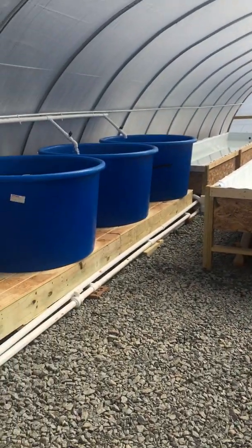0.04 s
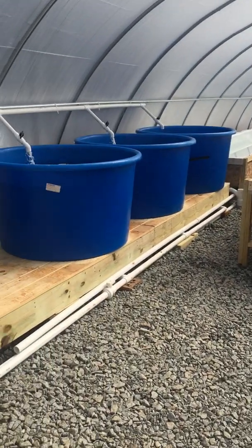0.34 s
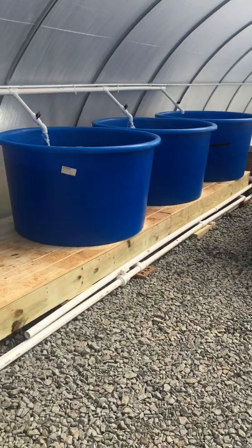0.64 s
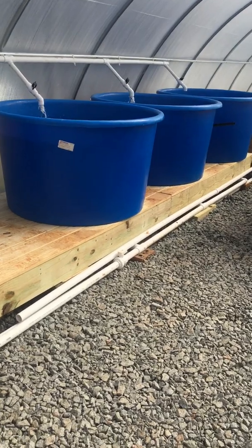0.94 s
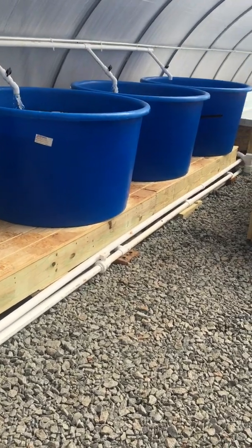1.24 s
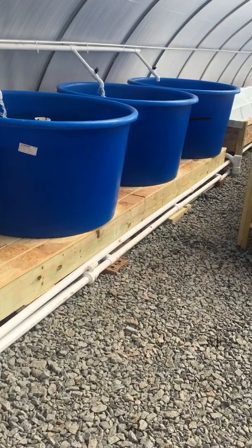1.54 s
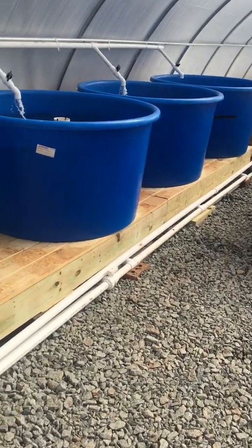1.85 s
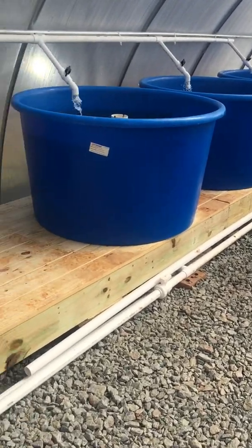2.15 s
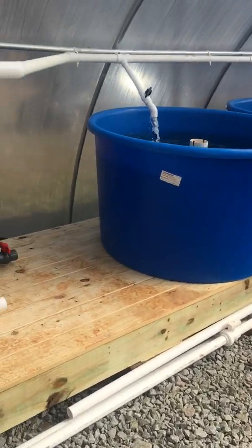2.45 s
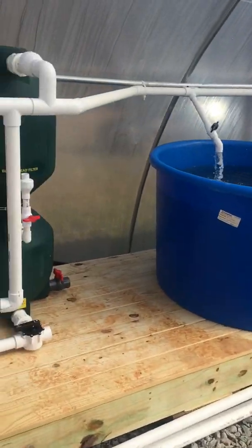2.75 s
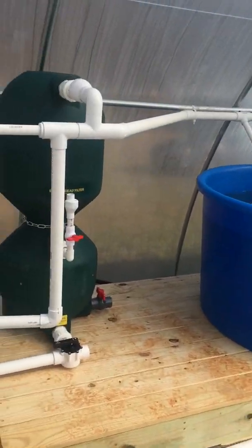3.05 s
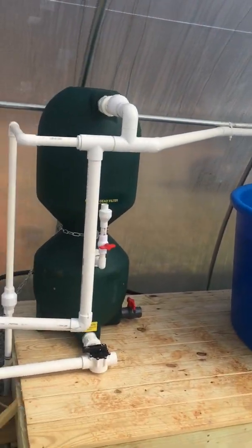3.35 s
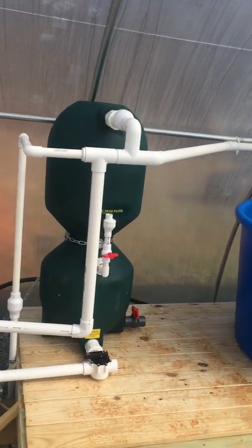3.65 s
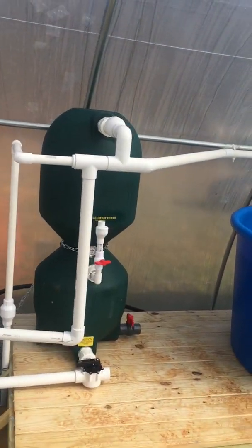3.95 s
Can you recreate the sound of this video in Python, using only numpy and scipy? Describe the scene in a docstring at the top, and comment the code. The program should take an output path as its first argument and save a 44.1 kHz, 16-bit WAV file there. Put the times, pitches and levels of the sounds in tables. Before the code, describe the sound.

Water pours steadily from pipes into big plastic tanks in a greenhouse, bubbling and splashing over a pump hum and low rumble. It grows louder and fuller as the handheld microphone moves up to one tank.

```python
"""A steady wash of water, jets pouring from pipes into big plastic tanks in a greenhouse.
Countless drops and ringing bubbles make the wash; brief sprays, plops, gulps and sloshes stand out,
with a few faint, broad scuffs, perhaps footsteps on gravel. A pump hums over a low room rumble,
and the walls give a short, dull echo. The handheld microphone moves up to one tank, passing
through the standing waves of the hum, and the water grows louder and fuller."""
import sys
import numpy as np
from scipy import signal
from scipy.fft import rfft, irfft
from scipy.io import wavfile
from scipy.ndimage import uniform_filter1d

SR = 44100
rng = np.random.default_rng(int(sys.argv[2]) if len(sys.argv) > 2 else 0)


def int16_out(signal):
    """Quantize to a 16-bit WAV file."""
    q = np.round(np.clip(np.atleast_2d(signal).T, -1, 1) * 32767)
    wavfile.write(sys.argv[1], SR, q.astype(np.int16))


N = 176400
TIME = np.arange(N) / SR
BINS = np.fft.rfftfreq(N, 1 / SR)
BUBBLE_RISE = 0.0415  # fractional rise in pitch per decay time

# spectrum of the room rumble: f/Hz, relative level/dB
RUMBLE_SPECTRUM = [(15, -34), (28, -15), (40, -21), (55, -1.5), (70, -3.5), (88, -4), (120, -9), (200, -23),
                   (500, -34)]
# handling bumps on the microphone: t/s, level/dB, decay/s
HANDLING_BUMPS = [(.01, -48, .11), (1.77, -48, .04)]
# pump hum along the walk: t/s, level/dB of harmonics 1, 3, 4 and 5
HUM_LEVELS = [(0, -49, -59, -53.5, -54), (0.55, -49, -56.5, -49, -53), (0.8, -47.5, -60.0, -51, -57),
              (1.0, -47.6, -59, -57.8, -53.5), (1.12, -47, -55.5, -57, -51.5),
              (1.3, -46, -54, -50.5, -51.6), (1.6, -45.5, -50.5, -48.5, -54.5),
              (1.92, -45, -51.5, -46.5, -52.5), (2.08, -43.5, -49.9, -51, -48.8),
              (2.24, -44.0, -53.5, -61, -47), (2.45, -43.5, -50, -48, -50.5), (2.7, -43.7, -50.5, -45, -49),
              (3.0, -43.5, -48, -48, -51.5), (3.3, -44, -49.7, -46.5, -49.5),
              (3.65, -44.1, -49.5, -45, -47.5), (4.0, -44.6, -53, -44.2, -49)]
# hollow resonances of the tanks: f/Hz, width/Hz, level/dB relative to the pouring
TANK_MODES = [(1400, 36, -17.5), (1453, 47, -42), (970, 70, -26)]
# bursts of spray: t/s, level/dB, centre f/Hz, decay/s
SPRAYS = [(0.156, -39, 3780, 0.01), (.348, -32.5, 8500, 0.0043), (.455, -33.5, 9000, 0.0046),
          (.617, -36, 6400, 0.011), (0.667, -37, 8500, 0.0078), (1.092, -29.5, 4000, 0.0031),
          (1.329, -36, 12000, 0.0027), (1.456, -36, 8500, 0.0097), (1.884, -34, 7000, .005),
          (2.254, -33, 7450, 0.0055), (2.431, -30, 6960, 0.0055), (2.473, -31, 7500, .005),
          (2.556, -29, 5800, 0.006), (2.66, -42.5, 7000, 0.017), (2.77, -36.5, 6500, 0.01),
          (3.03, -26, 4900, 0.003), (3.136, -29, 6500, 0.0043), (3.197, -33.5, 9500, 0.0057),
          (3.346, -34.5, 4300, 0.013), (3.347, -36, 11000, .01), (3.423, -31.5, 4670, .009),
          (3.546, -36, 7500, .008), (3.824, -28.5, 8500, 0.0032), (3.84, -34, 8000, 0.012)]
# single large bubbles: t/s, level/dB, f/Hz, decay/s
PLOPS = [(.395, -39.5, 900, .009), (1.346, -33, 2900, 0.0022), (1.986, -23, 1770, 0.00098),
         (2.396, -29, 740, 0.0022), (2.517, -24.5, 5700, .0011), (2.98, -35, 870, .005),
         (3.033, -25, 5600, 0.002), (3.334, -32, 830, 0.0037), (3.745, -21.5, 2440, 0.0013)]
# gulps, sloshes and a few faint, broad scuffs (half width an octave or more), perhaps steps on gravel:
# t/s, level/dB, centre f/Hz, half width/octaves, decay/s
GULPS_AND_SCUFFS = [(.388, -44, 1300, .2, 0.013), (0.738, -46, 2450, .25, .06),
                    (0.779, -42.5, 1420, 0.06, 0.019), (0.994, -41, 1290, .45, 0.019),
                    (1.01, -42, 800, 1.2, .022), (1.077, -43, 970, 1.1, 0.055),
                    (1.25, -46.5, 2980, .2, 0.055), (1.34, -47, 2880, 0.22, .02),
                    (1.445, -40.5, 2400, 0.74, 0.026), (1.686, -43, 2430, 0.47, 0.034),
                    (1.885, -44, 1020, 0.3, 0.03), (2.29, -44, 900, 0.45, .03),
                    (2.529, -39, 1300, 0.51, 0.03), (2.795, -40.5, 1520, .1, .035),
                    (2.823, -40, 2600, 0.48, .025), (2.974, -35, 730, .4, 0.015),
                    (3.236, -44, 2970, .15, 0.046), (3.295, -40, 980, 0.26, 0.014),
                    (3.453, -38.5, 1600, 0.56, 0.066), (3.742, -36.5, 1800, 1, .02),
                    (3.753, -37, 1190, 1.5, .018), (3.835, -36, 1700, 0.49, 0.011)]
# tone of the water: f/Hz, relative level/dB from afar, relative level/dB close up
WATER_SPECTRUM = [(151, -13.5, -1.5), (230, -6, -6), (397, -5.5, -3.5), (624, -2.5, 1), (763, -11.5, -4),
                  (890, -3.5, -1), (1100, -10, -5.5), (1290, -11, -2.5), (1380, -2.5, -2.5), (1870, -6, -3),
                  (2740, -4.5, -2.5), (3400, -6, -5.5), (4370, -9.5, -5), (4950, -11, -9.5), (5300, -9, -6),
                  (6500, -7, -5), (7600, -11, -9), (8460, -8, -6.5), (9820, -9.5, -8), (10300, -14.5, -13),
                  (11240, -10.5, -8.5), (12900, -13, -11), (15300, -17.5, -15.5)]
# the walk up to the tank: t/s, nearness (0 far, 1 close)
NEARNESS = [(0, 0), (.7, 0.3), (1.7, 0.1), (2.25, 0.7), (2.55, 0.9), (4, 1)]
# the pouring along the walk: t/s, level/dB
POUR_LEVEL = [(0, -44), (.7, -43), (1.45, -42), (2.3, -40.5), (2.6, -40), (3.2, -39.5), (3.75, -39.5),
              (4, -39)]


def amp(db):
    """Decibels to gain."""
    return 10 ** (np.asarray(db) / 20)


def unit_rms(x):
    """Scales to an rms of one."""
    return x / np.sqrt(np.mean(x ** 2) + 1e-20)


def curve(table, column=1):
    """One column of a table over time."""
    columns = np.transpose(table)
    return np.interp(TIME, columns[0], columns[column])


def colour(x, table, column=1):
    """Filters by one column of a spectrum table; rms one."""
    columns = np.transpose(table)
    gain_db = np.interp(np.log(BINS + 1), np.log(columns[0]), columns[column])
    cepstrum = irfft(np.log(amp(gain_db)), N)
    cepstrum[1:N // 2] *= 2  # minimum phase: ringing follows each drop
    cepstrum[N // 2 + 1:] = 0
    return unit_rms(irfft(rfft(x) * np.exp(rfft(cepstrum)), N))


def cut(x, order, hz, kind):
    """Butterworth high-pass or low-pass."""
    return signal.sosfilt(signal.butter(order, hz, kind, fs=SR, output="sos"), x)


def wander(rate_hz):
    """Smooth random drift up to about the given rate; rms one."""
    spectrum = rfft(rng.standard_normal(N)) * BINS / (BINS + 2)
    return unit_rms(irfft(spectrum / (1 + (BINS / rate_hz) ** 2), N))


def clicks(per_s, spread_db):
    """Random impulses, many small and a few large."""
    size = amp(spread_db * np.minimum(rng.exponential(1, N), 4.5))
    return size * rng.choice([-1, 1], N) * (rng.random(N) < per_s / SR)


def burst(hz, octaves, decay_s, per_s, attack_s):
    """Small impacts around one pitch that swell quickly and die away."""
    t = TIME[:SR // 2]
    detune = (np.log2(np.fft.rfftfreq(len(t), 1 / SR) + 1) - np.log2(hz)) / octaves
    impacts = rng.standard_normal(len(t)) * (rng.random(len(t)) < per_s / SR)
    band = unit_rms(irfft(rfft(impacts) / (1 + detune ** 2), len(t)))
    return band * np.minimum(t / attack_s, 1) * np.exp(-t / decay_s)


def add(mix, start_s, sound):
    """Mixes a sound in at a given time."""
    part = mix[max(round(start_s * SR), 0):][:len(sound)]
    part += sound[:len(part)]


def rumble(midway_db=-58.5, db_per_s=-1.4):
    """Low room tone that slowly recedes, with dull bumps of the hand on the microphone."""
    level = amp(midway_db + db_per_s * (TIME - TIME.mean()))
    out = level * colour(rng.standard_normal(N), RUMBLE_SPECTRUM)
    for start_s, db, decay_s in HANDLING_BUMPS:
        bump = burst(hz=48, octaves=0.34, decay_s=decay_s, per_s=710, attack_s=0.015)
        add(out, start_s, amp(db) * bump)
    return out


def pump(hum_hz=120.03, second_db=-63):
    """Motor hum: all harmonics but the second swell and fade as the microphone crosses standing waves."""
    first, third, fourth, fifth = (curve(HUM_LEVELS, column) for column in (1, 2, 3, 4))
    hum = np.zeros(N)
    for harmonic, db in enumerate([first, second_db, third, fourth, fifth], 1):
        phase = 2 * np.pi * (harmonic * hum_hz * TIME + rng.random())
        waver = 0.11 * np.sqrt(harmonic) * wander(rate_hz=2.5)
        hum += np.sqrt(2) * amp(db) * np.sin(phase + waver)
    return hum


def greenhouse(direct, t60_s=0.28, echo_db=-7):
    """Adds a short, dull echo from the arched walls that keeps changing as the microphone moves."""
    t, echo = TIME[:SR // 2], np.zeros(N)
    dull = cut(direct, order=1, hz=4560, kind="low")
    shares = np.array([wander(rate_hz=6.6) for _ in range(4)])  # crossfade among four echo patterns
    for share in shares / np.linalg.norm(shares, axis=0):
        reflections = rng.standard_normal(len(t)) * (rng.random(len(t)) < 2000 / SR)
        tail = reflections * (t > 0.004) * amp(-60 * t / t60_s)
        echo += signal.fftconvolve(dull * share, tail / np.linalg.norm(tail))[:N]
    return direct + amp(echo_db) * echo


def tank_ring():
    """The air in the tanks rings hollowly; steady noise stands for the splashing that drives it."""
    noise = rng.standard_normal(N)
    return sum(amp(db) * unit_rms(signal.lfilter(*signal.iirpeak(hz, hz / width, SR), noise))
               for hz, width, db in TANK_MODES)


def wash(patch_db=1):
    """The blurred rush of all the tanks, its level uneven in small patches of pitch and time."""
    spectrogram = signal.stft(rng.standard_normal(N), nperseg=512)[2]
    patches = uniform_filter1d(rng.standard_normal(spectrogram.shape), size=7, axis=0)
    patches = unit_rms(uniform_filter1d(patches, size=9, axis=1))
    return unit_rms(signal.istft(spectrogram * amp(patch_db * patches))[1][:N])


def drops(clump_db=4.5):
    """Drops strike the water in quick clumps, each a bright tick."""
    ticks = clicks(per_s=6000, spread_db=3) * amp(clump_db * wander(rate_hz=70))
    return unit_rms(cut(ticks, order=1, hz=1530, kind="high"))


def bubbles(low_hz, high_hz, per_s, spread_db, decay_cycles, sizes=56):
    """Bubbles of many sizes ring and die away, rising a little in pitch."""
    out = np.zeros(N)
    shares = np.sin(np.pi * (np.arange(sizes) + 0.5) / sizes)
    for hz, share in zip(np.geomspace(low_hz, high_hz, sizes), shares):
        age = np.arange(0, 5, hz / decay_cycles / SR)  # in decay times
        ring = np.exp(-age) * np.sin(2 * np.pi * decay_cycles * age * (1 + BUBBLE_RISE * age / 2))
        births = clicks(per_s / sizes, spread_db)
        out += np.sqrt(hz * share) * unit_rms(signal.oaconvolve(births, ring)[:N])
    return unit_rms(out)


def splashes_and_scuffs():
    """Bright spray, plops of large bubbles, gulps, sloshes and faint scuffs, perhaps steps on gravel."""
    out, t = np.zeros(N), TIME[:SR // 4]
    for start_s, db, hz, decay_s in SPRAYS:
        spray = burst(hz, octaves=0.62, decay_s=decay_s, per_s=16000, attack_s=0.0036)
        add(out, start_s, amp(db) * spray)
    for start_s, db, hz, decay_s in PLOPS:
        rise = 1 + BUBBLE_RISE * np.tanh(t / decay_s / 2) / 2
        add(out, start_s, amp(db) * np.exp(-t / decay_s) * np.sin(2 * np.pi * hz * t * rise))
    for start_s, db, hz, octaves, decay_s in GULPS_AND_SCUFFS:
        add(out, start_s, amp(db) * burst(hz, octaves, decay_s, per_s=2500, attack_s=0.0028))
    return out


def pouring():
    """Jets hit the water: thin and hollow from afar, louder and fuller with the microphone close."""
    patter = drops()
    fizz = bubbles(low_hz=2430, high_hz=15550, per_s=3500, spread_db=3.3, decay_cycles=2.64)
    gurgle = bubbles(low_hz=650.3, high_hz=4002, per_s=900, spread_db=2.5, decay_cycles=19)
    water = amp(-3.5) * wash() + amp(-4.5) * patter + amp(-7) * fizz + amp(-11) * gurgle
    water = cut(water, order=2, hz=110, kind="high")
    distant = colour(water, WATER_SPECTRUM, column=1) + tank_ring()
    close = colour(water, WATER_SPECTRUM, column=2)
    nearness = curve(NEARNESS)
    return amp(curve(POUR_LEVEL)) * ((1 - nearness) * distant + nearness * close)


def scene():
    """Water, scuffs and their echo over the pump and the room tone, on one microphone."""
    return (greenhouse(pouring() + splashes_and_scuffs()) + pump() + rumble())[None]


def record(dry):
    """The recorder cuts the highest treble steeply."""
    low_pass = signal.firwin(801, cutoff=15730, window=("kaiser", 9), fs=SR)
    return signal.oaconvolve(dry, low_pass[None], "same")


dry = scene()
out = record(dry)
int16_out(out)
```